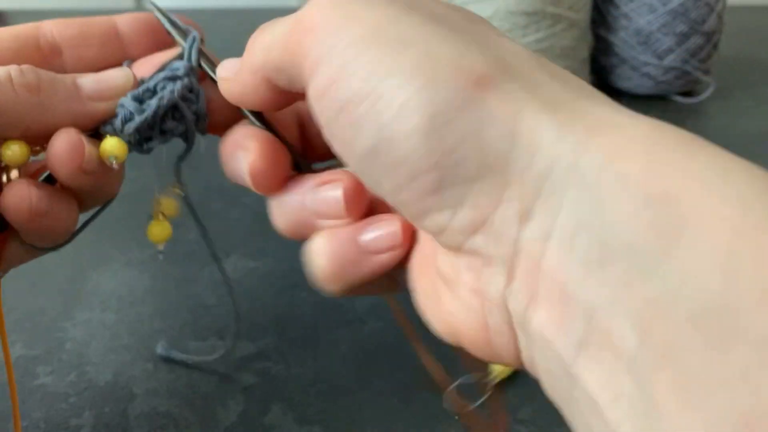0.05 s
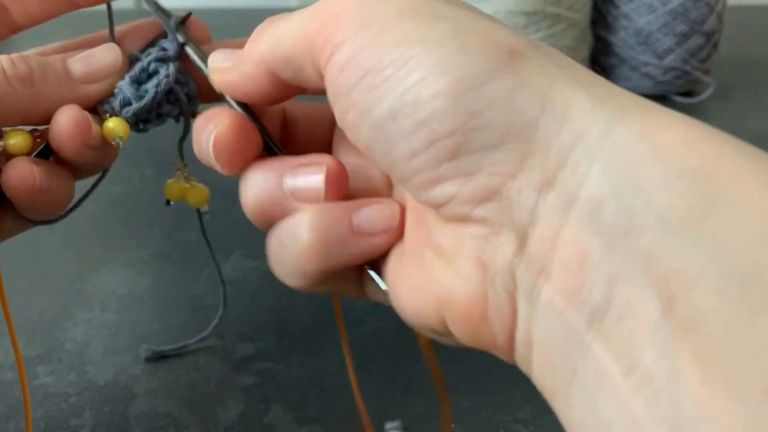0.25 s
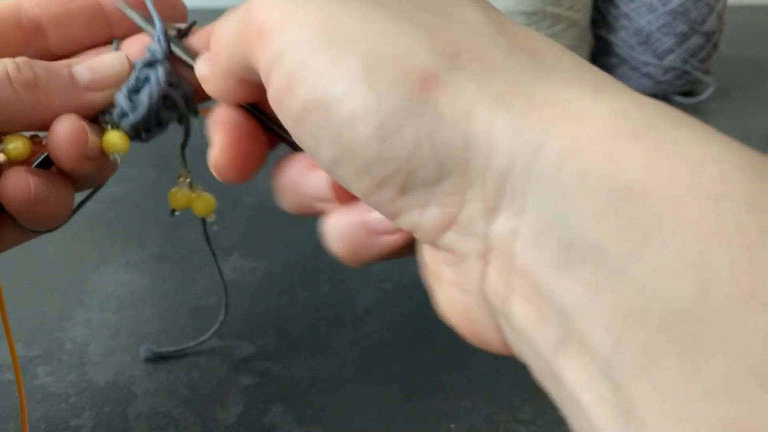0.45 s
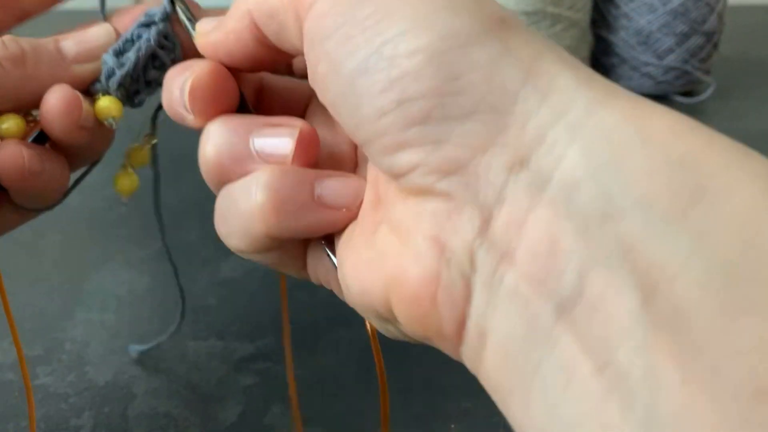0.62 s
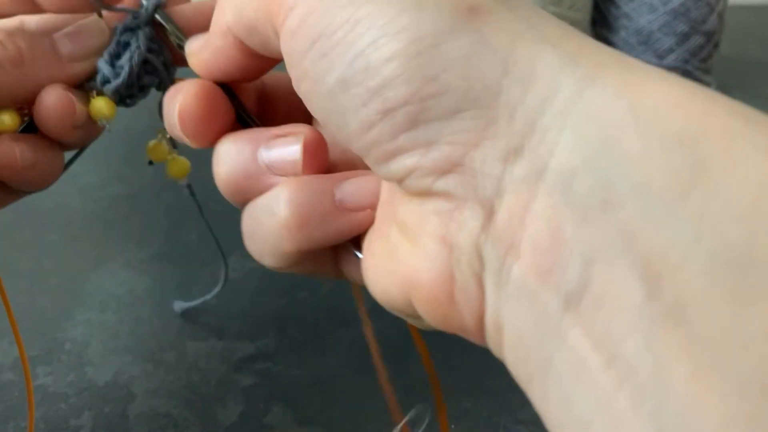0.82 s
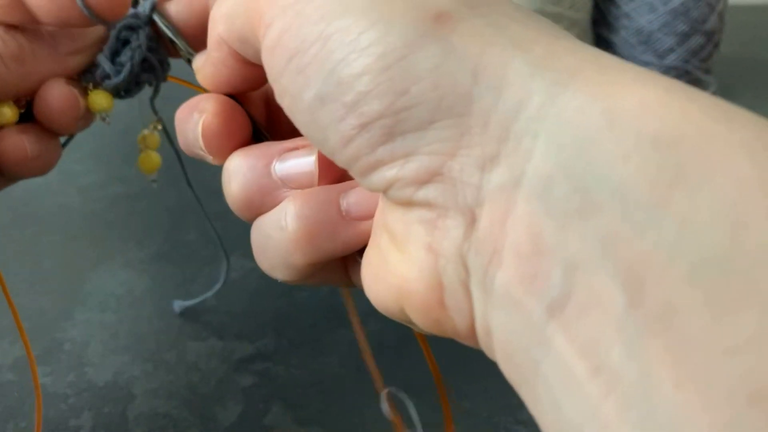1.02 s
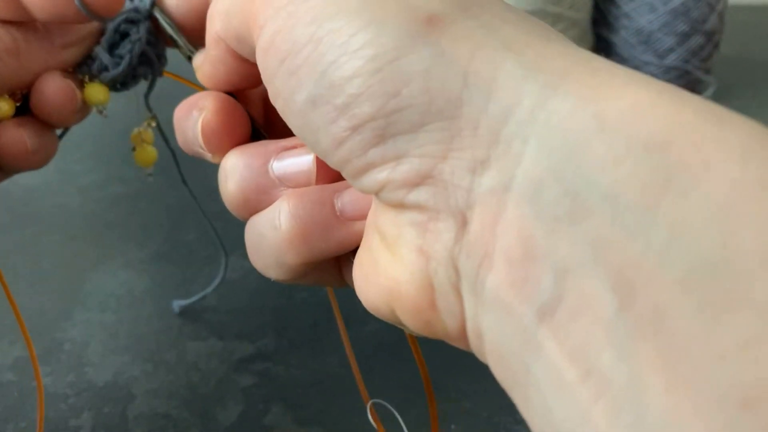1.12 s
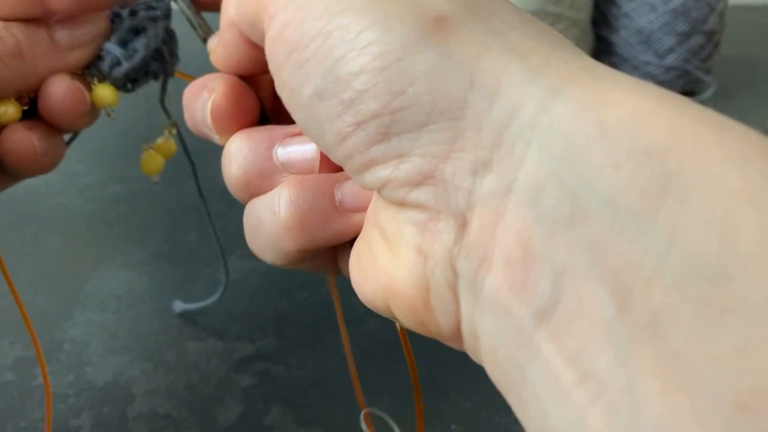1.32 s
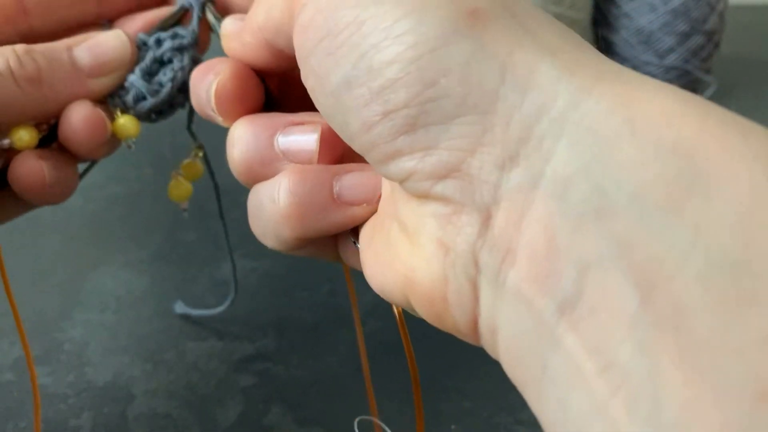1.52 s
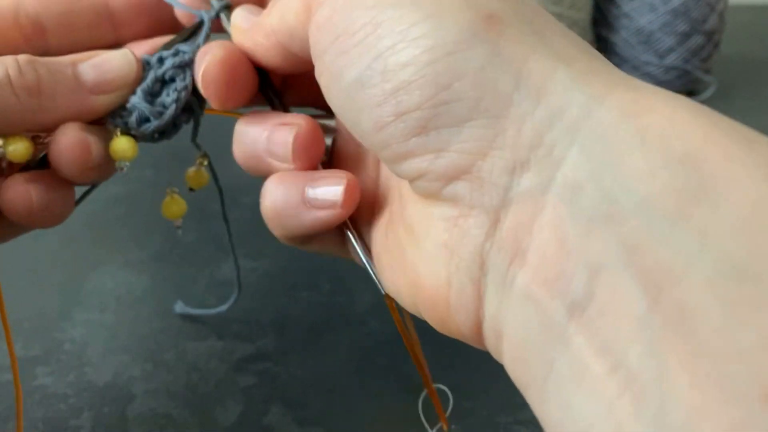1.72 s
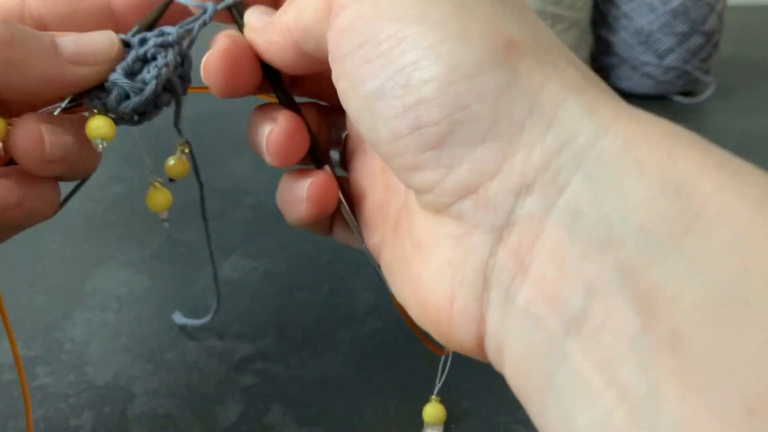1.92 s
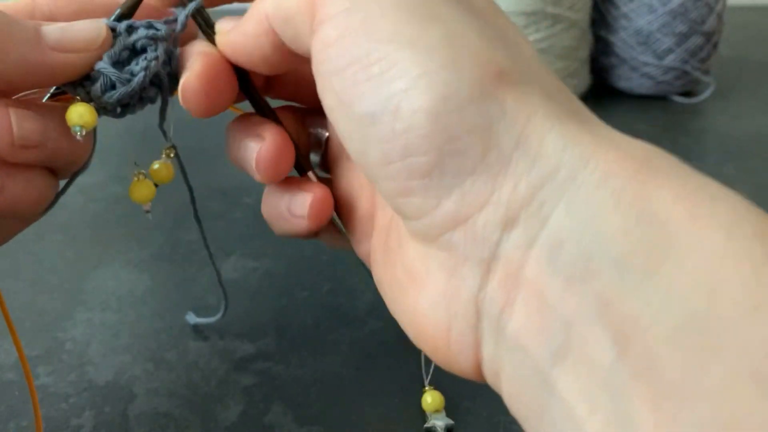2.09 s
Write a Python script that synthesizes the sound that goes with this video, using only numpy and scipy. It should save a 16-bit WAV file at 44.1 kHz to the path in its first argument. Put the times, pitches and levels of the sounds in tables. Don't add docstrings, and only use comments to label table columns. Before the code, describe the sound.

Close stereo phone pickup of hollow metal needles working one stitch, clicking and ringing over rasping wool in the first second, going almost still, then ticking and rustling softly again over faint low room hum.

```python
import sys
import numpy as np
from scipy import signal
from scipy.fft import rfft, irfft, next_fast_len
from scipy.io import wavfile
from scipy.ndimage import map_coordinates

SR = 44100
rng = np.random.default_rng(int(sys.argv[2]) if len(sys.argv) > 2 else 0)


def to_wav(sig):
    pcm = np.clip(np.atleast_2d(sig), -1, 1) * 32767
    pcm = np.round(pcm).astype(np.int16)
    wavfile.write(sys.argv[1], SR, pcm.T)


def magnitude_from_level(level_db):
    exponent = np.asarray(level_db, float) / 20
    return 10 ** exponent


N = 94815

# f/Hz, level/dB
HUM_COLOUR = [(22, -19.5), (55, 0), (76, -11.5), (100, 0), (190, -8.5), (400, -20), (900, -25),
              (2500, -41.5), (13000, -39), (16000, -44.5)]
# f/Hz, level/dB, time to fade by 60 dB/s
WORKTOP_MODES = [(99.45, -9, 0.33), (193.7, 1, 0.16), (241.5, -5.5, 0.11), (328, -14.5, 0.082)]
# t/s, level/dB, pitch factor, hardness/(dB per octave)
CABLE_BUMPS = [(0.234, -45, 1.1, -3.5), (0.329, -52.5, 1.1, 8.5), (.577, -41.5, 1.8, 0),
               (0.638, -54, 1.4, 10), (0.808, -33.5, 1.32, -17), (0.851, -44.5, 1.035, 9),
               (0.884, -32.5, 1.06, -7.5), (.962, -38, 0.97, -5), (1.04, -41.5, 0.91, -15.5),
               (1.105, -41, 0.97, -12), (1.842, -50.5, 1.13, -0.5), (2.06, -55, 0.97, -14)]
# t/s, length/ms, level/dB
YARN_SQUEAKS = [(.659, 14, -32), (.670, 10, -33), (.68, 7, -29), (.684, 7, -31), (.688, 9, -28),
                (.702, 9, -36), (.819, 12, -49), (.833, 20, -51), (.843, 12, -49), (.8545, 9, -42),
                (.866, 30, -52), (.885, 30, -54)]
# f/Hz, width/Hz, level/dB
SQUEAK_MODES = [(13000, 580, 0)]
# t/s, level/dB
SHAFT_KNOCKS = [(.0540, -16), (.0690, -12), (.0800, -14), (.0890, -14), (.2080, -9), (0.2354, 4),
                (.2520, -14), (.2660, -9), (.2760, -6), (.3005, -11), (.3350, -11), (.5755, 2),
                (0.5785, 12), (.5945, -8), (.6455, -3), (0.8048, -11), (.8072, -15), (.9625, -19),
                (1.5030, -38), (1.7860, -30), (1.8035, -24), (1.8270, -19), (1.8310, -18), (1.8445, -12),
                (1.8575, -12), (1.8710, -20), (1.918, -20), (2.049, -26)]
# f/Hz, width/Hz, level/dB
SHAFT_MODES = [(330, 150, -10), (990, 170, 0), (2010, 200, -8), (3040, 300, -8), (3720, 200, -8),
               (6100, 600, -14)]
# t/s, level/dB
TIP_SNAPS = [
    (.2356, -9),
    (.6442, 6),
    (.8049, -19),
    (.9625, -40),
    (1.3745, -48),
    (1.8438, -5),
    (1.8446, -9),
    (1.8577, -19),
]
# f/Hz, width/Hz, level/dB
SNAP_RINGING = [(12700, 1400, -2), (14300, 1600, 0), (7600, 1500, -14)]
# t/s, tube level/dB, tip ping
# above it/dB, length/ms
NEEDLE_CLICKS = [(0.0288, -35.5, -13, 18), (0.0331, -37, -7.5, 8), (0.0544, -29, -2.5, 5),
                 (0.0683, -26, -7.5, 10), (0.0789, -27, -10.5, 10), (0.088, -29, -1.5, 6.4),
                 (.104, -33, -9, 12), (0.124, -31.5, -6.5, 7), (.133, -31, -7, 4.1), (0.1392, -32, -6.5, 6),
                 (.154, -35, -10.5, 8.1), (0.17, -37.5, -4.5, 5), (.191, -34, -4, 5.7), (.198, -33, -2, 4),
                 (0.2079, -27, -4, 7), (0.235, -14.5, -3, 13), (0.251, -32, -18.5, 3.4),
                 (0.257, -32, -4, 6.5), (0.2654, -22, -3.5, 12), (.275, -21, -4.5, 12),
                 (0.300, -23, -5, 14), (0.33, -33, -1.5, 8), (0.333, -27, 0, 12), (0.366, -37, -3.5, 6.7),
                 (0.404, -36, -3, 3.6), (.421, -32.5, -5, 4), (0.4384, -36, -3, 11), (0.446, -32, 0, 7.2),
                 (0.5732, -19, -0.5, 8), (0.5756, -19.5, -1.5, 6), (0.578, -16, -5, 12),
                 (0.592, -31.5, -2.5, 4), (0.594, -28, -5, 4.6), (.628, -28.5, -2, 5.6),
                 (0.645, -16.5, -5, 12), (0.8044, -22, -15, 10), (0.8199, -36.5, -5, 6.07),
                 (0.846, -40, -6, 5),
                 (0.963, -39.5, -30, 19), (0.977, -40.5, -27, 26), (1.373, -67, 5, 3),
               (1.502, -53.5, -6.5, 6), (1.787, -50.5, -10, 7), (1.803, -41, -4, 6.9),
               (1.8253, -29.5, -9, 12.3), (1.8303, -32, -6.5, 9), (1.8452, -26, -3, 8.8),
               (1.857, -27.5, -4, 8), (1.8644, -30.5, -1.5, 4.95), (1.8674, -31.5, -4.5, 4.3),
               (1.8711, -32.5, -7, 7), (1.888, -37, -11, 9.5), (1.919, -48.5, -9, 9),
               (2.042, -49, -28.5, 5.3), (2.048, -46, -19, 7.2)]
# f/Hz, width/Hz, level/dB
TUBE_MODES = [(340, 150, -10), (880, 150, -3), (1030, 150, 3), (1720, 140, -4), (2000, 170, -1),
              (2750, 200, -5), (3030, 200, -3), (3700, 230, -1)]
# f/Hz, level/dB
TUBE_COLOUR = [(150, 0), (500, -4.5), (1000, -4), (2000, 1), (4500, -3), (8000, -6), (16000, -44)]
# f/Hz, level/dB
FIZZ_COLOUR = [(2500, -49.5), (5000, -12.5), (9000, 4.5), (11500, -0.5), (13200, -15), (15500, -12.5)]
# f/Hz, width/Hz, level/dB
TIP_MODES = [(6050, 520, 4), (7900, 990, 1), (12700, 1100, 2), (13900, 1200, 0)]
# t/s, level/dB, brightness/dB
ENTER_STROKE = [(0, -56.5, -26.5), (0.031, -59, -20.5), (.065, -51, -15), (.105, -45, -9),
                (.185, -46.5, -10), (.203, -51, -12), (.225, -49, -12), (.27, -44, -16.5), (.35, -44, -8),
                (.455, -43, -2), (.48, -54, -13.5), (0.563, -60, -17)]
# t/s, level/dB, brightness/dB
WRAP_STROKE = [(0.581, -38.5, -3.5), (.65, -40.5, -6.5), (.685, -40, -3.5), (0.719, -44.5, -5),
               (.8, -46, -20), (.87, -52, -10.5), (.95, -64, -29.5), (0.971, -47.5, -32), (1.06, -61, -41),
               (1.15, -83.5, -50)]
# t/s, level/dB, brightness/dB
SLIP_STROKE = [(1.773, -99, -13.5), (1.788, -57, -15), (1.825, -51, -15), (1.838, -54, -18),
               (1.855, -46.5, -15), (1.875, -45.5, -13), (1.931, -50, -11.5), (2.0, -58.5, -25),
               (2.051, -50.5, -28.5), (2.15, -65.5, -36)]
# f/Hz, width/Hz, depth from 0 to 1
WOOL_FIZZ_DIP = (10200, 2200, .6)
# f/Hz, time to fade by 60 dB/s
ROOM_FADE = [(200, .35), (2000, .32), (8000, .2), (10000, .1), (13000, .14), (15500, .06)]
# f/Hz, likeness from 0 to 1
PORT_LIKENESS = [(30, .9), (400, .85), (750, .3), (5000, .3), (7500, .85), (9600, .99), (13000, .98),
                 (16000, .8)]


def unit(x):
    return x / np.sqrt(np.mean(x ** 2) + 1e-20)


def along(points, hz):
    f, v = np.transpose(points)
    return np.interp(np.log(hz + 1), np.log(f + 1), v)


def wobble(rate):
    knots = rng.standard_normal(int(N * rate / SR) + 4)
    return map_coordinates(knots, [np.arange(N) * rate / SR])


def noise():
    return rng.standard_normal((2, N))


def filtered(x, response):
    m = next_fast_len(N + SR // 2)
    return irfft(rfft(x, m) * response(np.fft.rfftfreq(m, 1 / SR)), m)[..., :N]


def resonances(modes, f):
    return sum(magnitude_from_level(db) * 1j * f * w / (c * c - f * f + 1j * f * w) for c, w, db in modes)


def burst(times, db, ms):
    rise_share = 0.27
    env = np.zeros(N + 2000)
    t = np.arange(2000) / SR * 1000
    for start, level, length in np.broadcast(times, db, np.maximum(ms, .2)):
        rise = 1 - np.exp(-t / (rise_share * length))
        env[round(start * SR):][:2000] += magnitude_from_level(level - 15 * t / length) * rise
    return env[:N]


def hum():
    level_db = -64.5 + 1.0 * wobble(15)
    return magnitude_from_level(level_db) * unit(filtered(noise(), lambda f: magnitude_from_level(along(HUM_COLOUR, f))))


def far_pipe():
    centre_s, width_s, level_db = 1.64, 0.12, -78
    swell = np.exp(-((np.arange(N) / SR - centre_s) / width_s) ** 4)
    tone = unit(filtered(noise(), lambda f: resonances([(437, 12, 0)], f)))
    return magnitude_from_level(level_db) * swell * tone


def sleeve_swish():
    centre_s, width_s, level_db = 1.43, .07, -72.5
    swell = np.exp(-((np.arange(N) / SR - centre_s) / width_s) ** 2)
    cloth = unit(filtered(noise(), lambda f: resonances([(12530, 5500, 0)], f)))
    return magnitude_from_level(level_db) * swell * cloth


def worktop():
    out = np.zeros(N + SR)
    t = np.arange(SR // 3) / SR
    soft_start = 1 - np.exp(-t / 0.0027)
    lowest_hz = WORKTOP_MODES[0][0]
    for start, db, pitch, hard_db in CABLE_BUMPS:
        ring = 0
        for hz, level, t60 in WORKTOP_MODES:
            fade = magnitude_from_level(level + hard_db * np.log2(hz / lowest_hz) - 60 * t / t60)
            ring = ring + fade * np.sin(2 * np.pi * hz * pitch * t)
        out[round(start * SR):][:len(t)] += magnitude_from_level(db - 4.5) * ring * soft_start
    shared = out[:N]
    return np.array([shared, np.roll(shared, 150)])


def squeaks():
    start, ms, db = np.transpose(YARN_SQUEAKS)
    rub = burst(start, db + 12, ms) * noise()
    return filtered(rub, lambda f: resonances(SQUEAK_MODES, f) ** 2)


def knocks():
    side = -.7
    force = np.zeros((2, N))
    for start, db in SHAFT_KNOCKS:
        force[:, round(start * SR)] = magnitude_from_level(db + 1.5) * np.array([1, side])
    return filtered(force, lambda f: resonances(SHAFT_MODES, f))


def snaps():
    force = np.zeros((2, N))
    for start, db in TIP_SNAPS:
        force[0, round(start * SR)] = magnitude_from_level(db)
    return filtered(force, lambda f: resonances(SNAP_RINGING, f))


def needle(f):
    broad_db = -12
    return magnitude_from_level(along(TUBE_COLOUR, f)) * (magnitude_from_level(broad_db) + resonances(TUBE_MODES, f))


def ping(f):
    return magnitude_from_level(along(FIZZ_COLOUR, f)) + resonances(TIP_MODES, f) / (1 + (3000 / (f + 1)) ** 2)


def clicks():
    click_db, snap_db, ping_shorter = 3, -3, 0.44
    start, db, ping_db, ms = np.transpose(NEEDLE_CLICKS)
    snap_at = np.round(start * SR).astype(int) + 12

    def contact(level_db, length, colour):
        force = burst(start, level_db, length) * noise()
        force[0, snap_at] += magnitude_from_level(level_db + snap_db) * 3 / ms
        return filtered(magnitude_from_level(click_db) * force, colour)

    tube = contact(db, ms / 2, needle)
    tips = contact(db + ping_db, ping_shorter * ms / 2, ping)
    return tube + tips


def fibre_grain():
    fibres_per_s, fibre_ms, spread_db, share = 600, 2.8, 3.5, 0.45
    draw = rng.random((int(fibres_per_s * N / SR), 2))
    size_db = spread_db * np.minimum(-np.log(draw[:, 1]), 3)
    slips = unit(burst(draw[:, 0] * N / SR, size_db, fibre_ms))
    return (1 - share + share * slips) * magnitude_from_level(1.2 * wobble(30))


def shifting_tube(rub):
    shift_share, shifts_per_s = .02, 9
    turn = np.pi / 4 * (1 + np.tanh(wobble(shifts_per_s)))
    lower_tuned = filtered(rub * np.cos(turn), lambda f: needle(f * (1 + shift_share)))
    higher_tuned = filtered(rub * np.sin(turn), lambda f: needle(f * (1 - shift_share)))
    return unit(lower_tuned + higher_tuned)


def wool():
    t = np.arange(N) / SR
    start, drag_db, bright_db = np.transpose(ENTER_STROKE + WRAP_STROKE + SLIP_STROKE)
    drag_db = np.interp(t, start, drag_db)
    bright_db = np.interp(t, start, bright_db)
    grain = fibre_grain()
    body = shifting_tube(grain * noise())

    grip_s, grip_width_s, grip_db, grip_hz = .78, .15, -6, 1400
    grip = magnitude_from_level(grip_db * np.exp(-((t - grip_s) / grip_width_s) ** 4))
    body = body + (grip - 1) * filtered(body, lambda f: 1 / (1 + (f / grip_hz) ** 8))

    dull_hz, dull_below_db = 2880, -26
    top = 1 / (1 + magnitude_from_level(2 * (dull_below_db - bright_db)))
    body = body + (top - 1) * filtered(body, lambda f: 1 - 1 / (1 + (f / dull_hz) ** 3))

    dip_hz, dip_width_hz, depth = WOOL_FIZZ_DIP
    wool_top_hz = 15000

    def soft_ping(f):
        dip = 1 - depth * np.exp(-((f - dip_hz) / dip_width_hz) ** 2)
        return ping(f) * dip / (1 + (f / wool_top_hz) ** 20)

    fizz = unit(filtered(grain * noise(), soft_ping))
    return magnitude_from_level(drag_db) * (body + magnitude_from_level(bright_db - 0.5) * fizz)


def room(x):
    builds_s = .012
    hz, t, z = signal.stft(rng.standard_normal((2, SR * 3 // 4)), SR, nperseg=256)
    fade = magnitude_from_level(-60 * t / along(ROOM_FADE, hz)[:, None])
    tail = signal.istft(z * fade * (1 - np.exp(-t / builds_s)), SR, nperseg=256)[1]
    delayed = np.pad(x, ((0, 0), (200, 0)))
    return signal.fftconvolve(delayed, tail / np.linalg.norm(tail[0]), axes=1)[:, :N]


def ports(pair):
    lead_s, lead_rad, lead_from_hz = 1.43e-4, .7, 600

    def blend(f):
        turn = np.arccos(np.clip(along(PORT_LIKENESS, f), -1, 1)) / 2
        return np.array([np.cos(turn), np.sin(turn)])

    def left_leads(f):
        lead = (lead_rad + 2 * np.pi * f * lead_s) / (1 + (lead_from_hz / (f + 1)) ** 6)
        return np.exp(.5j * np.outer([1, -1], lead))

    mid, side = filtered(pair, blend)
    return filtered(np.array([mid + side, mid - side]), left_leads)


def scene():
    room_db = -12
    background = hum() + far_pipe() + sleeve_swish()
    hands = snaps() + clicks() + wool()
    echo = magnitude_from_level(room_db) * room(hands)
    return ports(background + worktop() + squeaks() + knocks() + hands + echo)


def band_limit(x):
    return signal.sosfilt(signal.butter(12, 16810, fs=SR, output="sos"), x)


def record(dry):
    top_hz = 16000
    mix = filtered(dry, lambda f: 1 / (1 + (f / top_hz) ** 60))
    return band_limit(mix)


dry = scene()
out = record(dry)
to_wav(out)
```